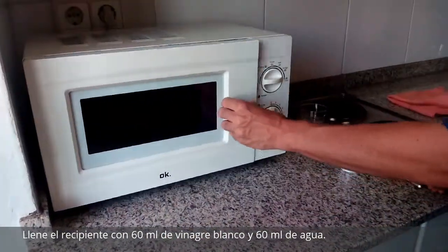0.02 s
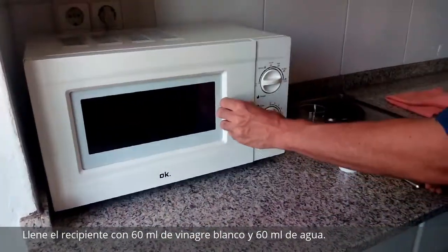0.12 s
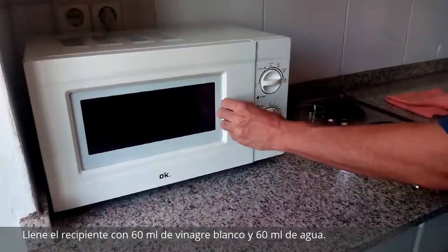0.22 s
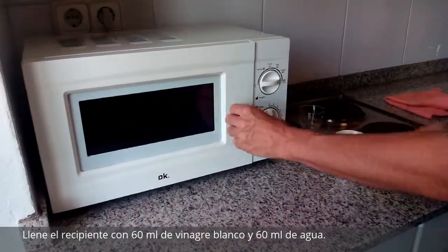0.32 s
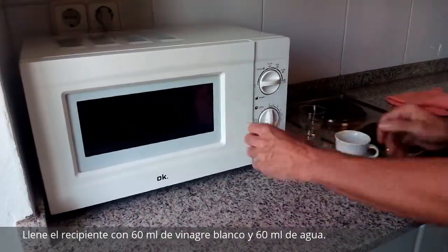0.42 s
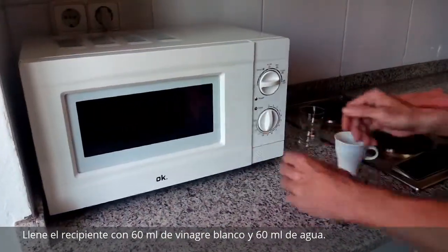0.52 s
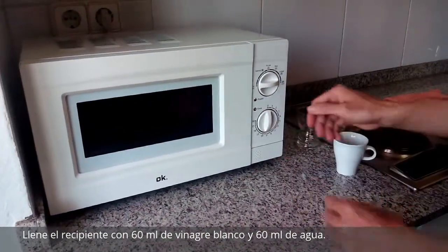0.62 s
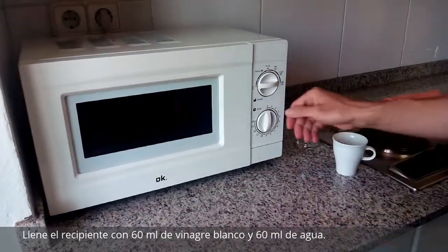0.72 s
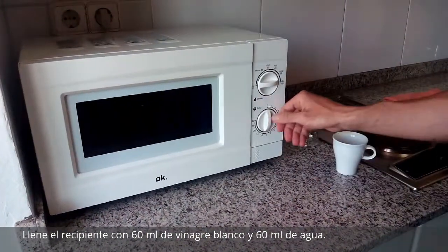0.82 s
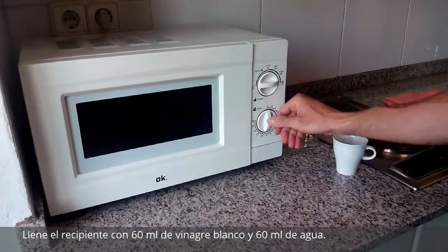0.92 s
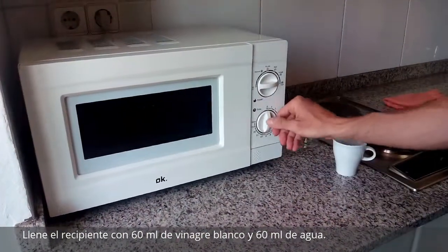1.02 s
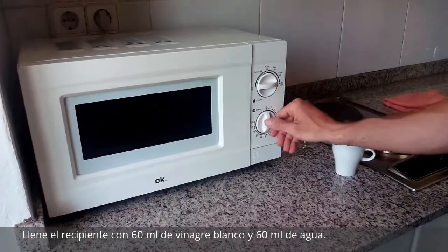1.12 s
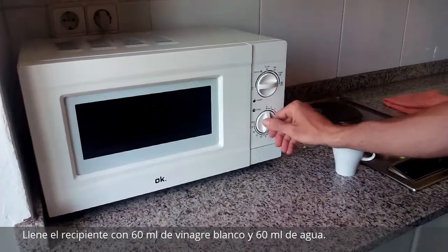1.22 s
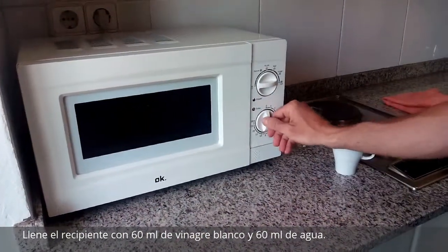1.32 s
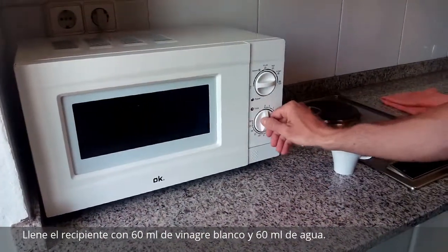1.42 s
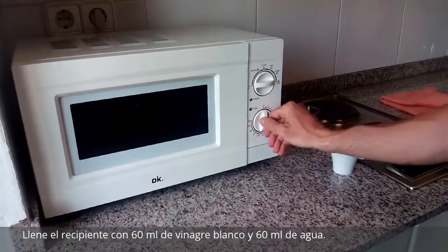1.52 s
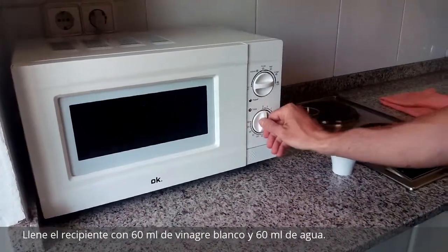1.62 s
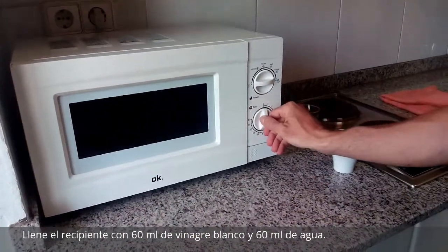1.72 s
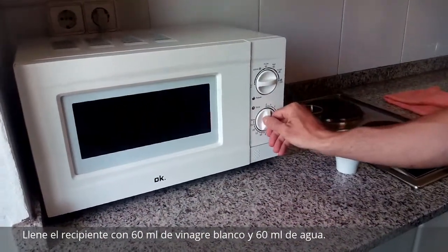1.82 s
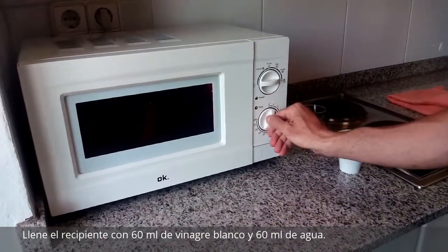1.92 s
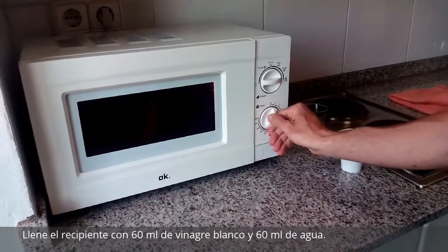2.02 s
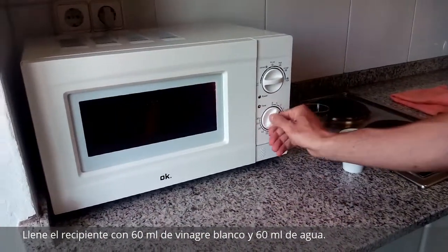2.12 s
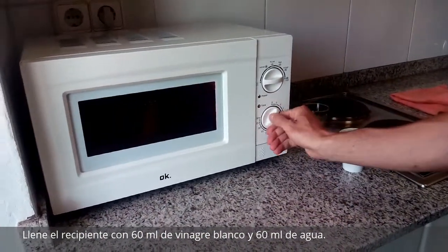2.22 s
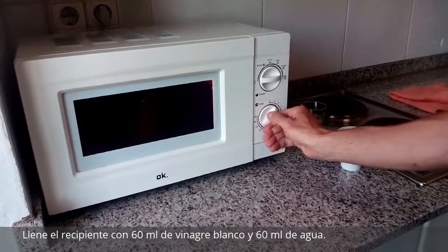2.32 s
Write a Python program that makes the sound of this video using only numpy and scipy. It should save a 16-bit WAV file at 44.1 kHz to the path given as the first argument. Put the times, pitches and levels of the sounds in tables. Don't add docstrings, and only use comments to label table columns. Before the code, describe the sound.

A microwave oven door is pushed shut with a loud, rattling slam that rings the steel case. A quiet pause, a fingertip tick, then dial clicks and a low hum, heard close in a tiled kitchen.

```python
import sys
import numpy as np
from scipy import signal
from scipy.fft import rfft, irfft, next_fast_len
from scipy.io import wavfile
from scipy.ndimage import uniform_filter1d

SR = 44100
rng = np.random.default_rng(int(sys.argv[2]) if len(sys.argv) > 2 else 0)


def to_linear_factor(level_db):
    exponent = np.asarray(level_db, float) / 20
    return 10 ** exponent


def unload_audio(sound):
    columns = np.transpose(np.atleast_2d(sound))
    steps = np.round(np.clip(columns, -1, 1) * 32767)
    wavfile.write(sys.argv[1], SR, steps.astype(np.int16))


N = 105840
T = np.arange(N) / SR
FREQ_HZ = np.arange(N // 2 + 1) * SR / N

# pitch_hz [Hz], t60_s [s], level_db [dB], left_right_likeness [0-1]
KITCHEN = [(62, 0.52, -11, 0.95), (150, 0.74, 5, 1), (400, 0.6, 4, 1), (1020, 0.51, 6.5, 1),
           (2315.5, 0.64, 2.5, 0.7), (5540, 0.62, -0.5, 0), (8310, 0.4, -3.5, 0), (14900, 0.14, 15, 0)]
# time_s [s], level_db [dB]
POWER_UP = [
    (1.99, -40),
    (2.04, -20),
    (2.085, -8),
    (2.14, -1),
    (2.2, 0),
    (2.4, 0),
]


def on_log(hz, table, order=1):
    table = np.array(table, float)
    return np.interp(np.log(np.maximum(hz, 1)), np.log(table[:, 0]), table[:, order])


def unit(x):
    return x / np.sqrt(np.mean(x ** 2))


def tinted(x, table):
    return irfft(rfft(x) * to_linear_factor(on_log(FREQ_HZ, table)), N)


def coloured(table):
    return unit(tinted(rng.standard_normal(N), table))


def impulse(at_s):
    return 1. * (np.arange(N) == int(at_s * SR))


def fall(at_s, t60):
    return (T >= at_s) * to_linear_factor(-60 * np.maximum(T - at_s, 0) / max(t60, .001))


def burst(at_s, len_s):
    return (T >= at_s) * np.exp(-np.maximum(T - at_s, 0) / max(len_s, .0003))


def soften(at_s, rise_s):
    return 1 - burst(at_s, rise_s)


def push(len_s):
    force = rng.standard_normal(N) * burst(0, len_s)
    return force / np.sqrt(np.sum(force ** 2))


def ring(at_s, modes):
    out = np.zeros(N)
    first = int(np.ceil(at_s * SR))
    for hz, db, t60 in modes:
        t60 = max(t60, .001)
        t = T[first:first + int(2 * t60 * SR)] - at_s
        out[first:first + len(t)] += to_linear_factor(db - 60 * t / t60) * np.sin(2 * np.pi * hz * t)
    return out


def conv(x, h):
    size = next_fast_len(2 * N)
    return irfft(rfft(x, size) * rfft(h, size), size)[..., :N]


def walk(rate):
    k = int(SR / rate)
    steps = np.repeat(rng.standard_normal(N // k + 1), k)
    return 1.3 * uniform_filter1d(uniform_filter1d(steps, k), k)[:N]


def pair_bands(alike, order):
    f = np.maximum(FREQ_HZ, 1)
    noise = rfft(rng.standard_normal((2, N)))
    for hz in 25 * 2 ** np.arange(0, 9.4, .5):
        window = np.cos(np.pi * np.clip(np.log2(f / hz), -.5, .5)) ** 2
        mid, side = irfft(noise * window, N)
        c = np.clip(on_log(hz, alike, order), 0, 1)
        yield hz, np.sqrt((1 + c) / 2) * mid + np.sqrt((1 - c) / 2) * side * np.array([[1], [-1]])


def power_db(lead_s=0):
    return np.interp(T + lead_s, *np.array(POWER_UP).T, left=-100)


def seal_bump():
    # pitch_hz [Hz], level_db [dB], t60_s [s]
    bump_modes = [(140, 1.8, 0.07), (185, -9, 0.051), (423.5, -11.5, 0.035), (685, -10.5, .04)]
    # pitch_hz [Hz], density_db [dB per Hz]
    seal_colour = [(100, -8.5), (300, -9), (680, -3), (1000, -20), (2000, -17.5), (6000, -33.5)]
    bump_s, push_s = .1745, .0051
    soft = np.sin(np.pi * np.clip(T / push_s, 0, 1)) / (push_s * SR / 2)
    bump = conv(ring(bump_s, bump_modes), soft + 0.07 * push(push_s))
    rustle = coloured(seal_colour) * burst(bump_s, 0.11)
    return to_linear_factor(-35.5) * bump + to_linear_factor(-47) * rustle


def door():
    # start_s [s], level_db [dB], noise_length_s [s]
    contacts = [(.2192, -26, .005), (.234, -25, .003), (.2372, -21, .002), (.2391, -7, .003),
                (.2462, -17, .002), (.2487, -8, .003), (.2518, -1, .003), (.2555, -10, .003),
                (.2615, -8, .004), (.2665, -12, .002), (.2715, -12, .003), (.283, -14, .005),
                (.2905, -17, .004)]
    # pitch_hz [Hz], level_db [dB], t60_s [s]
    case_modes = [(138.8, -3, 0.21), (428, -13, 0.15), (545, -2.5, 0.076), (626, -5, 0.1),
                  (647, -3.5, 0.083), (735, -4, .12), (824.4, -3.5, 0.16), (1000, -14, 0.12),
                  (1150.6, -10.5, 0.12), (1235, -10, 0.1), (1685, -9, .07)]
    # pitch_hz [Hz], level_db [dB], t60_s [s]
    latch_modes = [(1510, -2, .012), (1940, -5, .012), (2590, -11, .01), (3850, -2, .01), (4270, -1, .008),
                   (4620, 4, .012), (5150, -3, .007), (5670, -3, .008), (6500, -11, .006)]
    # pitch_hz [Hz], density_db [dB per Hz]
    crack_colour = [(100, -16), (400, -10), (750, 3), (1500, -3.5), (3000, -3.5), (4700, -7.5),
                    (6500, -13.5), (15000, -18.5)]
    # pitch_hz [Hz], level_db [dB], t60_s [s]
    hook_modes = [(1500, 0, .04), (1250, -7, .03), (1800, -8, .02), (550, -8, .03)]
    hook_s = contacts[0][0]
    crack = coloured(crack_colour)
    out = seal_bump() + to_linear_factor(-32) * ring(hook_s, hook_modes) * soften(hook_s, 0.00088)
    for k, (s, db, len_s) in enumerate(contacts):
        struck = [(hz, d + 2 * rng.standard_normal(), t60) for hz, d, t60 in case_modes]
        case = ring(s, struck) * soften(s, 0.00091)
        case_db = -25.5 if k < 3 else -13.5
        latch = conv(ring(s, latch_modes), push(len_s))
        hit = to_linear_factor(-7) * crack * burst(s, len_s) + to_linear_factor(case_db) * case + to_linear_factor(-11.5) * latch
        out = out + to_linear_factor(db) * hit
    return out


def boom():
    # pitch_hz [Hz], density_db [dB per Hz]
    boom_colour = [(90, -30.5), (200, -16), (650, -3), (1400, -6.5), (3000, -11.5), (4700, -14),
                   (7500, -14), (15000, -22.5)]
    return to_linear_factor(30) * tinted(impulse(.2495), boom_colour)


def panels():
    # pitch_hz [Hz], level_db [dB], t60_s [s]
    panel_modes = [(101.2, -16.5, 0.37), (137.8, -44, .3), (183.4, -36, 2.07), (402, -55, 2.5)]
    # pitch_hz [Hz], level_db [dB], t60_s [s]
    skin_modes = [(289.8, -24.5, 1.4)]
    slam_s = .25
    hand_rests = np.clip((1.04 - T) / 0.011, 0, 1)
    seal_settles = np.clip((.66 - T) / 0.21, 0, 1) ** 2
    both = ring(slam_s, panel_modes) * hand_rests + ring(slam_s, skin_modes) * seal_settles
    return both * soften(slam_s, .02)


def touch():
    # pitch_hz [Hz], level_db [dB], t60_s [s]
    touch_modes = [(160, -17, .12), (640, -14, .04), (790, -10, .045), (1550, -11, .02), (2050, -11, .02),
                   (3850, 5, .014), (3500, -3, .012), (4150, -5, .01), (5100, -13, .008)]
    # pitch_hz [Hz], density_db [dB per Hz]
    thud_colour = [(150, -14), (400, -3), (750, 0), (1000, -10), (2200, -16), (4000, -30), (8000, -70)]
    touch_s = 1.1236
    tick = to_linear_factor(-34.5) * ring(touch_s, touch_modes)
    thud = to_linear_factor(-50) * coloured(thud_colour) * burst(touch_s, .03)
    return (tick + thud) * soften(touch_s, .0009)


def first_switch(grain):
    # pitch_hz [Hz], density_db [dB per Hz]
    snap_colour = [(700, -2), (2000, 0), (4600, -6), (5800, -16), (7700, -2), (9300, -3), (10500, -12),
                   (15000, -4)]
    # pitch_hz [Hz], level_db [dB], t60_s [s]
    snap_rings = [(4600, -54, .02), (7700, -40, .02), (9300, -37, .022), (11900, -40, .02),
                  (14500, -46, .015)]
    snap_s, len_s = 2.0738, .006
    contact = burst(snap_s, len_s) + .45 * grain * burst(snap_s, .05)
    snap = to_linear_factor(-46) * coloured(snap_colour) * contact * soften(snap_s, .002)
    return snap + conv(ring(snap_s, snap_rings), push(len_s))


def relay_switch(grain):
    # pitch_hz [Hz], level_db [dB], t60_s [s]
    relay_modes = [(820, 4, 0.05), (1010, -1, 0.035), (1390, -4, 0.035), (1850, -8, 0.02), (4660, -6, .035),
                   (5170, -8, .025), (5610, -9, .025), (6930, -6, .025)]
    # pitch_hz [Hz], density_db [dB per Hz]
    contact_colour = [(1000, -3), (3000, -3), (4800, 1), (6800, 0), (9500, 0), (13000, -6)]
    relay_s = 2.155
    frame = to_linear_factor(-42) * ring(relay_s, relay_modes) * soften(relay_s, 0.0019)
    contact = burst(relay_s, .011) + .55 * grain * burst(relay_s, .05)
    return frame + to_linear_factor(-47) * coloured(contact_colour) * contact


def dial():
    # time_s [s], rub_level_db [dB]
    turning = [(1.62, -80), (1.72, -72), (1.77, -68), (1.81, -73), (1.9, -73), (1.99, -70), (2.03, -61),
               (2.1, -60), (2.2, -63), (2.28, -69), (2.4, -68)]
    # pitch_hz [Hz], density_db [dB per Hz]
    rub_colour = [(100, -8.5), (250, -3.5), (500, -4), (1050, -2), (1500, -4), (3500, -18.5), (6500, -25),
                  (9000, -36)]
    # start_s [s], level_db [dB], pitch_hz [Hz]
    small_ticks = [(2.0195, -53, 3350), (2.037, -56, 2600), (2.057, -57, 2100), (2.085, -56, 3700),
                   (2.095, -52, 3750), (2.099, -55, 2300), (2.108, -57, 3600), (2.118, -54, 2600),
                   (2.121, -56, 3700)]
    grain = to_linear_factor(3.5 * walk(70))
    rub = coloured(rub_colour) * grain * to_linear_factor(np.interp(T, *np.array(turning).T, left=-120))
    ticks = sum(ring(s, [(hz, db, .012)]) for s, db, hz in small_ticks)
    return rub + ticks + first_switch(grain) + relay_switch(grain)


def hum():
    # mains_multiple [x], level_db [dB rms]
    hum_lines = [(2, -46), (3, -57), (4, -52), (6, -57), (8, -58), (10, -48), (11, -67), (20, -66),
                 (22, -71)]
    trims = [-1, 1, 0, 2, 2, 0, -3, -3, 1]
    flutters = [.6, 2, 1.5, 2, 2, .5, 3, 2.5, 2]
    mains_hz, flutter_hz = 50.6, 12
    out = np.zeros(N)
    for (multiple, db), trim_db, flutter_db in zip(hum_lines, trims, flutters):
        level = to_linear_factor(db + trim_db + flutter_db * walk(flutter_hz))
        out += level * np.sqrt(2) * np.sin(2 * np.pi * (multiple * mains_hz * T + rng.random()))
    return out * to_linear_factor(power_db())


def fan():
    # pitch_hz [Hz], density_db [dB per Hz]
    fan_colour = [(70, -20), (140, -3), (300, 0), (450, -5), (900, -20), (3000, -45), (8000, -80)]
    return to_linear_factor(-57 + power_db(lead_s=.04)) * coloured(fan_colour)


def room():
    tail = 0
    for hz, band in pair_bands(KITCHEN, order=3):
        near = fall(0, on_log(hz, KITCHEN))
        hall = to_linear_factor(-32) * fall(0, 1.61 * min(1, 3000 / hz))
        tail = tail + band * to_linear_factor(on_log(hz, KITCHEN, order=2)) * (near + hall)
    tail = tail * (1 - np.exp(-T / .004))
    return to_linear_factor(-2.5) * tail / np.sqrt(np.sum(tail ** 2) / 2)


def earlier():
    # pitch_hz [Hz], density_db [dB per Hz]
    knock_colour = [(60, -9), (270, 0), (450, -7.5), (785, 2.5), (1800, -7.5), (3500, -16), (6300, -25.5),
                    (8200, -43.5)]
    tail = sum(band * fall(-0.066, on_log(hz, KITCHEN)) for hz, band in pair_bands(KITCHEN, order=3))
    knock = np.roll(tinted(impulse(0), knock_colour), 64) * (T < .05)
    return to_linear_factor(-28.5) * 3 * conv(tail, knock)


def air():
    # pitch_hz [Hz], density_db [dB per Hz]
    air_colour = [(25, -19.5), (62, 2), (150, -4), (700, -7.5), (1800, -17.5), (2600, -19), (6600, -32),
                  (8000, -50.5)]
    # pitch_hz [Hz], left_right_likeness [0-1]
    air_alike = [(30, 1), (300, 0.4), (1000, 0.67), (3000, 0), (12000, 0.44)]
    # pitch_hz [Hz], width_hz [Hz], lift_db [dB]
    air_humps = [(1170, 130, 3.5), (2500, 230, 3), (5350, 390, 3)]
    swell_db = .5 * walk(0.64)
    bands = sum(band * to_linear_factor(swell_db + 1.2 * walk(1.8)) for hz, band in pair_bands(air_alike, order=1))
    humps_db = sum(db * np.exp(-((FREQ_HZ - hz) / width) ** 2) for hz, width, db in air_humps)
    humped = irfft(rfft(bands) * to_linear_factor(humps_db), N)
    return to_linear_factor(-57) * unit(tinted(humped, air_colour))


def scene():
    # pitch_hz [Hz], level_db [dB]
    mic_colour = [(40, -38.5), (75, -17), (98, 7), (6300, -0.15), (8500, -15), (15000, -26)]
    # pitch_hz [Hz], level_db [dB]
    touch_send = [(300, 6), (900, 6), (2500, 4), (3900, -11)]
    slam = tinted(door(), mic_colour)
    hand = tinted(dial(), mic_colour)
    tip = touch()
    send = tinted(boom(), mic_colour) + to_linear_factor(-11) * slam + to_linear_factor(-2) * hand
    send = send + to_linear_factor(-16) * tinted(tip, touch_send)
    near = slam + hand + tip + conv(send, room())
    return near + panels() + hum() + fan() + earlier() + air()


def low_pass(x):
    return signal.sosfilt(signal.butter(12, 15620, fs=SR, output="sos"), x)


def record(dry):
    # pitch_hz [Hz], left_minus_right_db [dB]
    port_tilt = [(60, 6), (200, 4), (500, 3), (1000, 4), (2000, -5.5), (4000, 5), (8000, 8), (13000, 14.5)]
    right_late_s, top_hz, clip_at = 0.00036, 15500, 2.7
    max_phase = 1.6
    size = next_fast_len(N + 4096)
    f = np.arange(size // 2 + 1) * SR / size
    tilt_db = on_log(f, port_tilt) / 2
    lag = max_phase * np.tanh(2 * np.pi * f * right_late_s / max_phase)
    ports = np.array([to_linear_factor(tilt_db), to_linear_factor(-tilt_db) * np.exp(-1j * lag)])
    x = irfft(rfft(dry, size) * ports * (f < top_hz), size)[:, :N]
    rounded = clip_at * np.tanh(x / clip_at)
    return low_pass(np.clip(rounded, -1, 1))


dry = scene()
out = record(dry)
unload_audio(out)
```